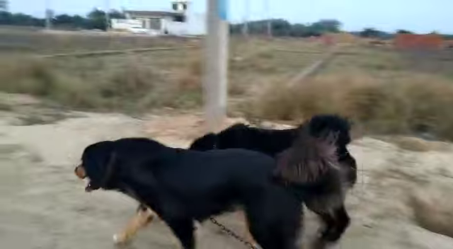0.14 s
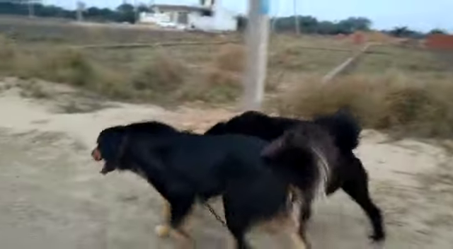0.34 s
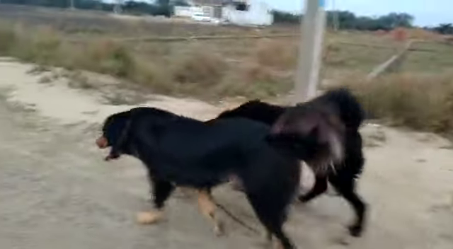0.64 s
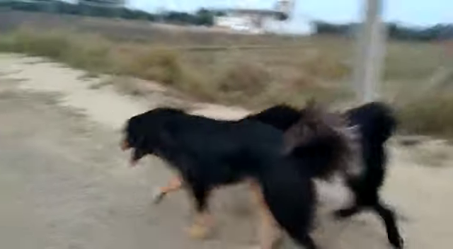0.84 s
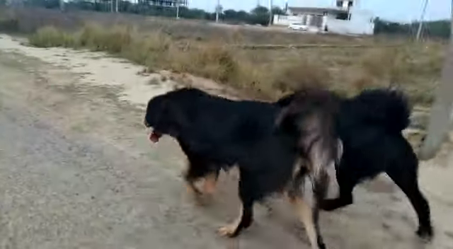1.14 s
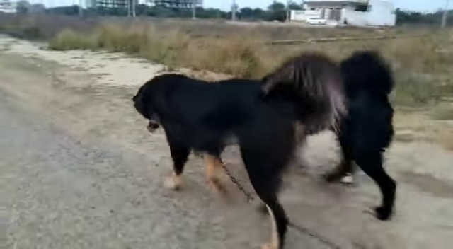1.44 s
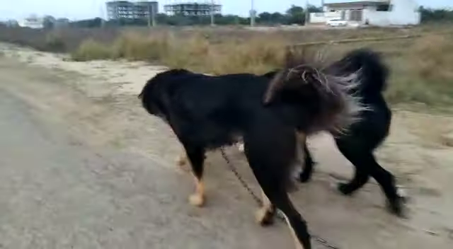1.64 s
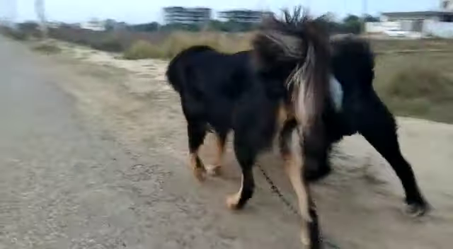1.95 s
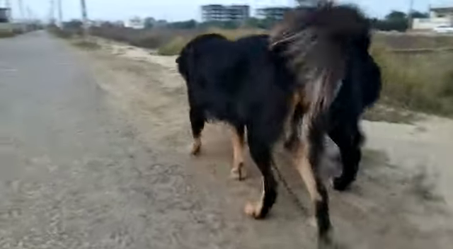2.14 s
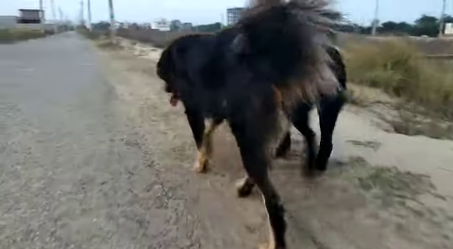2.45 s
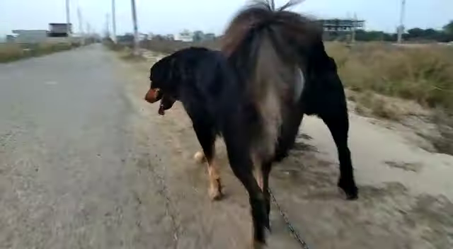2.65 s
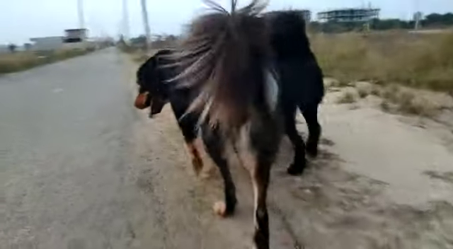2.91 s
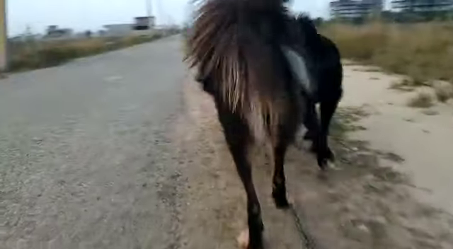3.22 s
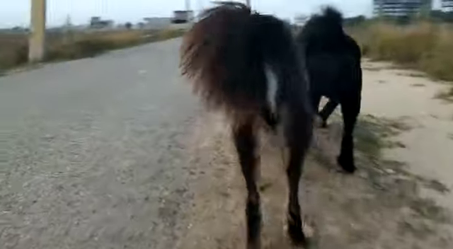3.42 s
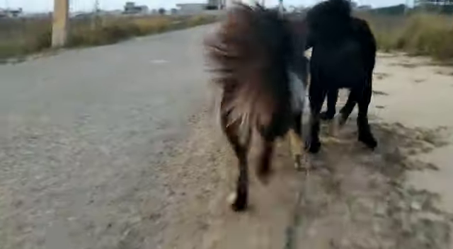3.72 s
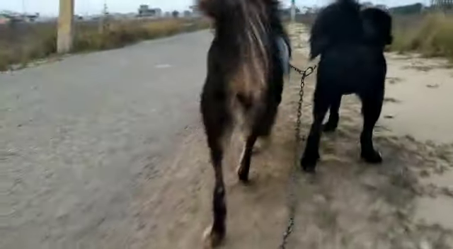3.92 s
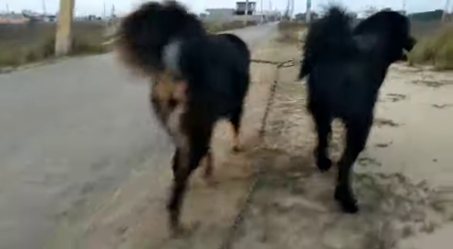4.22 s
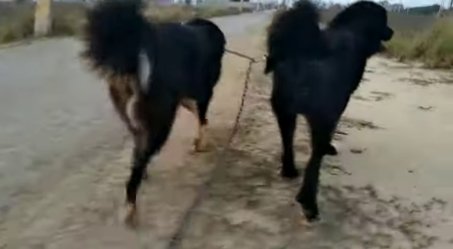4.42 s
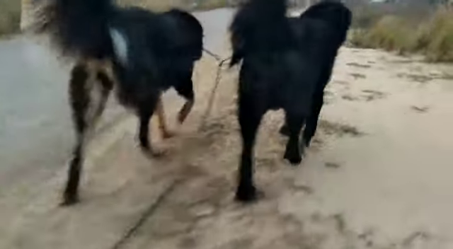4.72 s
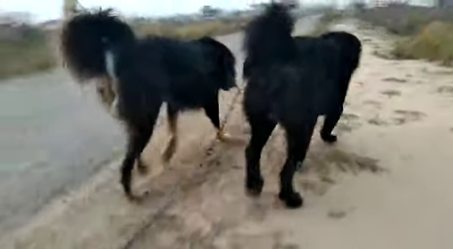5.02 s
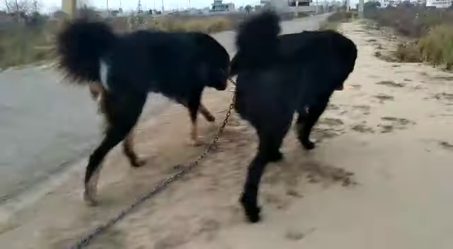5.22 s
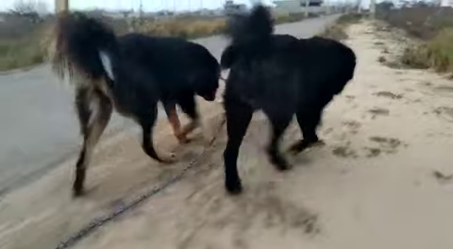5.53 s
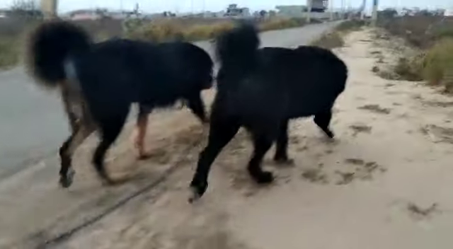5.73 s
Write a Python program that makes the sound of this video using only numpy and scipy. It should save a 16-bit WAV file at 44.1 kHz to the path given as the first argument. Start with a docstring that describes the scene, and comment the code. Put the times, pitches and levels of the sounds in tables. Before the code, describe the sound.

Thin metal links clink in scattered bursts, busiest around four seconds, over faint outdoor air, small birds, grit scrapes and wind puffs.

```python
"""A steel chain couples two big dogs on a quiet country road: links tick, ring, jingle and rattle.
Blows excite the chain's ringing modes; its free end drags over the grit as many tiny bursts of noise.
Soft paw pats are shaped noise, small birds whistle gliding tones, and a light breeze and a distant wash
are noise whose level comes and goes. Fingers slip on the hand-held phone, as short rough noise pushes.
The phone hears it all through two closely spaced ports, left and right."""
import sys
import numpy as np
from scipy import signal
from scipy.fft import rfft, irfft, next_fast_len
from scipy.io import wavfile
from scipy.ndimage import uniform_filter1d

SR = 44100
rng = np.random.default_rng(int(sys.argv[2]) if len(sys.argv) > 2 else 0)


def dump_mix(stems):
    """Bounce the given channels to the path in sys.argv[1] as a 16-bit WAV at rate SR."""
    frames = np.atleast_2d(stems).T  # one column per channel
    limited = np.clip(frames, -1, 1)  # hard clip at full scale
    pcm = np.round(limited * 32767).astype(np.int16)
    wavfile.write(sys.argv[1], SR, pcm)


N = 258426
TIME = np.arange(N) / SR

# Table levels are in dB; most layers also get an overall level where they are mixed.
# ringing modes of the chain, by letter (k to n are the short-lived ones of links under load):
# [f/Hz, level under a light touch/dB, time to fall 60 dB when free/s, scatter between links/Hz]
CHAIN_MODES = {"a": (7450, -14, .2, 25), "b": (8060, -13, .2, 35), "c": (8256, -11, .3, 15),
               "d": (8390, -13, .25, 30), "e": (8652, 0, .45, 7), "f": (8945, -1, .35, 25),
               "g": (9781, -13, .45, 8), "h": (10098, -10, .33, 12), "i": (11305, -14, .35, 10),
               "j": (14228, -9, .42, 10), "k": (7590, -14, .1, 60), "l": (8520, -12, .12, 50),
               "m": (8850, -10, .16, 30), "n": (9130, -12, .1, 45)}
# tone colour of links choked by their neighbours: [f/Hz, level/dB]
CLATTER_COLOUR = [(6000, -13), (7700, 16), (8100, -7), (8500, -7), (8930, 26), (9300, 17), (10100, 4),
                  (10700, -13), (11300, 23), (12200, 5), (15000, -26)]
# tone colour of grit and stones under the chain: [f/Hz, level/dB]
GRIT_COLOUR = [(1500, -13.5), (3000, -3), (4500, -16), (5400, 8), (6500, 3), (8000, 1.5), (11000, 0),
               (15000, -42)]
# tone colour of the distant wash, and of paws on sand: [f/Hz, level/dB]
WASH_COLOUR = [(100, -10.5), (350, -1.5), (750, 2), (1200, -2.5), (1800, -11), (3300, -7.5), (4600, -12),
               (8000, -13), (15300, -15.5), (16000, -51)]
# a dog's pull shakes the chain: [t/s, length/s, level of swinging links/dB, level of trailing links/dB]
PULLS = [(-.05, 0.048, -63, -67), (0.31, 0.36, -63, -66), (0.535, 0.29, -62.5, -60), (1.31, 0.27, -75, -64),
         (1.597, 0.3, -65, -58.5), (2.096, 0.54, -63, -71), (2.6, 0.2, -57.5, -55), (3.117, 0.13, -59, -53),
         (3.77, 0.11, -45, -56), (4.006, 0.08, -45.5, -53), (4.268, 0.45, -59, -57.5),
         (5.127, 0.057, -78, -60.5), (5.28, 0.06, -64, -58), (5.44, 0.16, -61, -55),
         (5.602, 0.26, -60.5, -53)]
PULL_ATTACK_S, PULL_RELEASE_S, PULL_SAG_DB_PER_S = 0.067, 0.1, -5.5


def undb(db):
    """Decibels to gain."""
    return 10 ** (np.asarray(db) / 20)


def unit(x):
    """Scale to rms 1."""
    return x / np.sqrt(np.mean(x ** 2) + 1e-20)


def gain_at(points, hz):
    """Gain of a (Hz, dB) spectrum, joined by straight lines on a log-frequency axis."""
    f, db = np.transpose(points)
    return undb(np.interp(np.log(hz + 1), np.log(f), db))


def colour(x, points, size=2048):
    """Causal filter with the given spectrum shape, built from the cepstrum of its log gain."""
    cepstrum = irfft(np.log(gain_at(points, np.fft.rfftfreq(size, 1 / SR))))
    # folding the cepstrum forward puts the whole response after the impulse
    cepstrum[1:size // 2] *= 2
    cepstrum[size // 2 + 1:] = 0
    response = irfft(np.exp(rfft(cepstrum)))
    return signal.fftconvolve(x, response / np.linalg.norm(response))[:len(x)]


def add(track, s, sound):
    """Mix a sound into the track at time s, cutting what falls outside."""
    start = int(s * SR)
    lo, hi = max(start, 0), min(start + len(sound), N)
    if hi > lo:
        track[lo:hi] += sound[lo - start:hi - start]


def curve(table):
    """A table of (s, value), joined by straight lines in time."""
    return np.interp(TIME, *np.transpose(table))


def walk(rate):
    """Wandering level: random values held for 1 / rate s and smoothed twice; spread near 1."""
    k = int(SR / rate)
    held = rng.standard_normal(N)[np.arange(N) // k]
    return 1.3 * uniform_filter1d(uniform_filter1d(held, k), k)


def flutter(shape, rate, db):
    """Gain that jumps about at the given rate, rms 1."""
    k = int(SR / rate)
    jumps = np.sqrt(k) * uniform_filter1d(rng.standard_normal(shape), k)
    return unit(undb(db * np.clip(jumps, -2, 2)))


def swells(rows, attack_s, release_s, sag_db_per_s, idle_db):
    """Gain of (s, length, dB) motions that rise, sag while they last and die away to an idle level."""
    power = undb(idle_db) ** 2
    for s, length, db in rows:
        t = TIME - s
        rise = np.clip(1 + t / attack_s, 0, 1)
        fall = np.exp(-np.clip((t - length) / release_s, 0, 20))
        sagging = undb(db + sag_db_per_s * np.clip(t, 0, length))
        power = power + (rise * fall * sagging) ** 2
    return np.sqrt(power)


def contacts(rate, spread_db):
    """Random impacts of uneven size and sign, about rate per second, rms 1."""
    size = undb(spread_db * np.minimum(rng.exponential(size=N), 4))
    hits = rng.random(N) < rate / SR
    return unit(hits * size * rng.choice([-1, 1], N))


def grains(rate, spread_db, decay_s):
    """Random impacts, each a tiny fading burst of noise, rms 1."""
    impacts = contacts(rate, spread_db)
    power = signal.lfilter([1], [1, -np.exp(-2 / (decay_s * SR))], impacts ** 2)
    return unit(np.sqrt(power) * rng.standard_normal(N))


def bursts(table, points, catch_db=0, size=8192):
    """Short rough (s, dB, length, hardness) pushes on a body; hard ones are brighter, catch_db roughens."""
    out, t = np.zeros(N), np.arange(size) / SR
    for s, db, length, hardness in table:
        swell = t / length * np.exp(-2 * (t / length) ** 2)
        push = swell * rng.standard_normal(size) * flutter(size, rate=420, db=catch_db)
        tilted = [(hz, level + hardness * np.log2(hz)) for hz, level in points]
        add(out, s, unit(colour(push, tilted)) * np.sqrt(length * SR / size) * undb(db))
    return out


def ports(x, balance, diffuse_db):
    """Left and right port: treble reaches the left later; sound scattered by the ground differs in each."""
    # phase by which left leads right: [f/Hz, phase/rad]
    port_phase = [(0, 0), (1640, 0), (2070, -3.1), (2850, -3.2), (3360, -6), (4000, -6.6), (4800, -9.3),
                  (5700, -11.3), (8960, -20.1), (13400, -30.8), (16200, -36)]
    size = next_fast_len(N + SR // 10)
    hz, spectrum = np.fft.rfftfreq(size, 1 / SR), rfft(x, size)
    lean = np.sqrt(gain_at(balance, hz))
    turn = np.exp(1j * np.interp(hz, *np.transpose(port_phase)))
    direct = irfft(np.array([spectrum * lean * turn, spectrum / lean]), size)[:, :N]
    t = TIME[:SR // 10]
    ground = rng.standard_normal((2, len(t))) * t * np.exp(-t / 0.0037)
    ground /= np.linalg.norm(ground, axis=1, keepdims=True)
    return direct + undb(diffuse_db) * signal.fftconvolve(x[None], ground, axes=1)[:, :N]


def distant_wash(db):
    """A far wash over the fields: coloured noise whose level wanders."""
    # [t/s, level/dB]
    wash_level = [(0.0, -63), (0.47, -65), (1.22, -61.5), (1.99, -67.5), (2.35, -64), (3.33, -66.5),
                  (3.87, -68), (4.06, -76), (4.32, -72.5), (5.02, -68), (5.26, -65.5), (5.6, -68.5),
                  (5.86, -65)]
    swell = 1.2 * walk(11)
    return undb(curve(wash_level) + db + swell) * colour(rng.standard_normal(N), WASH_COLOUR)


def paws(db):
    """Soft pats of paws on sand: short noise pushes, slightly dulled."""
    # [t/s, level/dB, length/s]
    pats = [(0.028, -46.5, 0.0041), (0.411, -49.5, 0.0046), (0.483, -54.5, 0.005), (0.594, -50.5, 0.007),
            (1.246, -56.5, 0.036), (1.377, -51, 0.0054), (1.591, -51, 0.0061), (3.064, -48, 0.0029),
            (2.87, -58.5, 0.021), (3.356, -50.5, 0.0029), (3.419, -53, 0.0067), (3.64, -55.5, 0.0088),
            (3.713, -49.5, 0.0076), (0.646, -56, 0.006), (3.993, -58, 0.0076), (4.736, -56, 0.0091)]
    hardness = -2  # dB per octave
    return undb(db) * bursts([(*row, hardness) for row in pats], WASH_COLOUR)


def thump(s, hz, db, length):
    """A short low boom at the ports: a tone that swells and fades once."""
    out, t = np.zeros(N), TIME[:int(length * SR)]
    add(out, s, undb(db) * np.sin(np.pi * t / length) * np.sin(2 * np.pi * hz * t))
    return out


def wind(breeze_db, puff_db, rumble_db):
    """Eddies push one port while they pull the other; a far rumble reaches both alike."""
    # tone colour of the breeze and the rumble: [f/Hz, level/dB]
    breeze_colour = [(25, -42.5), (45, -18.5), (65, -4), (105, 4), (170, -1), (260, -7.5), (450, -18),
                     (1000, -51.5)]
    # strength of the breeze: [t/s, level/dB]
    breeze_level = [(0, -70), (.6, -72.5), (1.1, -58.5), (1.6, -72.5), (2.5, -71.5), (3.6, -70), (4.3, -60),
                    (4.7, -55.5), (4.85, -53), (5.05, -58), (5.3, -52), (5.86, -57.5)]
    # puffs of air on the ports: [t/s, level/dB, length/s, hardness/dB per octave]
    puffs = [(1.117, -21, 0.012, 2.5), (3.655, -40, 0.025, -13.5), (4.011, -33, 0.035, -6),
             (4.022, -25.5, 0.0056, 0.5), (4.08, -47.5, 0.036, -5.5), (4.142, -42.5, 0.008, -7),
             (4.366, -43, 0.019, 1.5), (4.405, -49, 0.031, -4.5), (4.5, -44.5, 0.0092, -0.5),
             (4.625, -33.5, 0.016, -13.5), (4.655, -35, 0.0047, -9), (4.682, -35, 0.0065, -3.5),
             (4.696, -35, 0.0058, -6.5), (4.72, -30.5, 0.0067, -5), (4.773, -43.5, 0.008, -6),
             (5.29, -44.5, 0.015, -5), (5.39, -46, 0.037, -4)]
    # tone colour of a puff: [f/Hz, level/dB]
    puff_colour = [(30, -65), (70, -10), (130, -8), (190, -1), (260, -1.5), (500, -14), (800, -27.5),
                   (2000, -73), (6000, -53)]
    gusts = 2.6 * walk(14)
    breeze = undb(curve(breeze_level) + breeze_db + gusts) * colour(rng.standard_normal(N), breeze_colour)
    puffing = undb(puff_db) * bursts(puffs, puff_colour)
    eddies = breeze + puffing + thump(s=4.008, hz=189, db=-24, length=0.057)
    rumble = undb(rumble_db + walk(7.8)) * colour(rng.standard_normal(N), breeze_colour)
    return np.array([[-.66], [1.05]]) * eddies + rumble


def birds(db, echo_db, echo_s, slap_db, slap_s, rasp_hz, count=5):
    """Small birds whistle short glides and one quick raspy trill; the field throws them back faintly."""
    # glides that bow up (or down, if negative) in the middle:
    # [t/s, length/s, start f/Hz, end f/Hz, bow/Hz, level/dB]
    chirps = [(-.02, 0.039, 2990, 3670, 2, -56.5), (-.01, 0.1, 4630, 4190, -21, -62),
              (0.082, 0.024, 4130, 5100, 5, -54.5), (0.103, 0.038, 5100, 4300, 102, -51.5),
              (0.2, 0.048, 4000, 3000, 601.5, -53.5), (.24, 0.05, 2970, 2580, -60, -65),
              (0.353, 0.057, 3660, 3770, -1.5, -60), (0.396, 0.064, 3640, 3790, 334, -48),
              (.427, 0.058, 4180, 4430, 36, -53.5), (.27, 0.041, 4250, 3740, 50, -65.5),
              (.726, .035, 3250, 3680, 177, -63), (.75, 0.055, 3600, 2940, -2, -57),
              (0.788, 0.044, 3600, 3020, 62, -61.5), (1.04, 0.092, 3480, 3020, 620, -57.5),
              (1.122, 0.029, 3330, 2760, 43, -40.5), (1.135, 0.037, 3700, 3140, 30, -59),
              (1.293, 0.031, 4090, 3930, 200, -63.5), (1.313, 0.049, 3790, 4100, -3, -64.5),
              (3.361, 0.12, 2946, 2966, 23, -63.5), (4.857, 0.074, 3610, 2770, 3, -66),
              (5.265, 0.078, 3680, 3640, 60, -71), (5.317, 0.068, 3640, 2900, 7, -65.5),
              (5.775, 0.07, 3700, 2950, 90, -64.5)]
    trill_s, step_s, note_s, trill_rasp_hz = .503, .014, .021, 330
    trill = []
    for k, (early, loud) in enumerate(rng.standard_normal((count, 2))):
        start_s = trill_s + step_s * (k + 0.15 * early)
        trill.append((start_s, note_s, 6650, 3940, 0, -49 + 2 * loud))

    out = np.zeros(N)
    for notes, waver_hz in (chirps, rasp_hz), (trill, trill_rasp_hz):
        for s, length, start_hz, end_hz, bow_hz, chirp_db in notes:
            u = np.linspace(0, 1, int(length * SR))
            waver = unit(uniform_filter1d(rng.standard_normal(SR // 4), size=24))[:len(u)]
            glide = start_hz + (end_hz - start_hz) * u + bow_hz * np.sin(np.pi * u)
            hz = glide + waver_hz * waver
            note = undb(chirp_db + db) * np.sin(np.pi * u) * np.sin(2 * np.pi * np.cumsum(hz) / SR)
            add(out, s, note)
            add(out, s + slap_s, undb(slap_db) * note)  # one distinct echo
    field = rng.standard_normal(SR // 2) * np.exp(-TIME[:SR // 2] / echo_s)
    return out + undb(echo_db) * signal.fftconvolve(out, field / np.linalg.norm(field))[:N]


def fingers(db):
    """Fingers slip on the phone in short rough pushes; a soft knock comes with the low boom."""
    # the last row is the knock: [t/s, level/dB, length/s, hardness/dB per octave]
    rubs = [(1.075, -44, 0.056, 5), (1.110, -36, 0.01, 2), (1.119, -30, 0.012, 3), (1.132, -25, 0.0031, -1),
            (1.146, -44.5, 0.017, 8.5), (1.162, -43.5, 0.0056, 0), (3.135, -22, 0.0053, -1),
            (3.141, -19, 0.0055, 1), (3.154, -29, 0.0041, 4.5), (3.160, -16, 0.0095, 0.5),
            (3.171, -19, 0.0086, -1), (3.182, -30.5, 0.017, 4.5), (3.199, -27.5, 0.0044, 3),
            (3.209, -24, 0.0038, -1), (3.216, -43, 0.023, 4), (3.247, -37.5, 0.0053, 4),
            (3.25, -54, .035, 7), (4.022, -39, .004, -2)]
    # tone colour of the finger rubs, strongest about 400 to 920 Hz, uneven: [f/Hz, level/dB]
    rub_colour = [(100, -43), (250, -27), (320, -22.5), (400, 4), (455, -4.5), (545, 4.5), (660, -3),
                  (745, 4.5), (830, -2), (920, -0.5), (1010, -8), (1200, -7), (1600, -17), (2200, -21),
                  (3300, -18.5), (5000, -30.5), (8000, -31.5), (11000, -29), (13500, -36), (15500, -42)]
    return undb(db) * bursts(rubs, rub_colour, catch_db=4)


def stones():
    """The trailing end strikes stones: short, bright noise pushes."""
    # [t/s, level/dB, length/s]
    strikes = [(0.595, -43, 0.0055), (2.18, -35.5, 0.0018), (3.77, -40, 0.0012), (3.791, -39, 0.0067),
               (5.4615, -42.5, 0.003), (5.4965, -33, 0.0014), (5.839, -32.5, 0.00074)]
    hardness = 4.5  # dB per octave
    return bursts([(*row, hardness) for row in strikes], GRIT_COLOUR)


def scrape():
    """The chain's end drags over the grit: a dense shower of tiny noise bursts."""
    # [t/s, length/s, level/dB]
    drags = [(.512, 0.18, -54.5), (.598, 0.023, -45), (1.09, 0.011, -44.5), (1.45, 0.13, -56.5),
             (2.18, 0.015, -47), (2.64, 0.037, -56.5), (3.145, 0.043, -44.5), (3.725, 0.075, -45.5),
             (3.88, 0.23, -54.5), (4.19, 0.3, -61.5), (5.47, 0.05, -54.5), (5.837, .005, -72)]
    dragging = swells(drags, attack_s=0.019, release_s=0.048, sag_db_per_s=-23, idle_db=-77.5)
    grit = grains(rate=1100, spread_db=4.2, decay_s=0.0009)
    return dragging * colour(grit, GRIT_COLOUR)


def rattle(db):
    """Trailing links rattle as the dogs pull: many tiny touches whose level wanders."""
    # [f/Hz, level/dB]
    rattle_colour = [(3000, -44), (7000, -6), (9000, -2), (11000, 0.5), (11900, 6), (12150, 13.5),
                     (14000, 10), (15400, 7), (15750, -32)]
    s, length, _, rattle_db = np.transpose(PULLS)
    rows = zip(s, length, rattle_db)
    trailing = swells(rows, PULL_ATTACK_S, PULL_RELEASE_S, PULL_SAG_DB_PER_S, idle_db=-101)
    clusters = undb(1.3 * walk(30))
    touches = grains(rate=1500, spread_db=3.3, decay_s=0.0009)
    return undb(db) * trailing * clusters * colour(touches, rattle_colour)


def jingle(rate, free):
    """Light touches between swinging links keep their modes ringing, now one, now another."""
    out = 0
    for hz, db, t60, _ in CHAIN_MODES.values():
        # a resonator; free is the share of the free ring time that is left
        pole = np.exp(2j * np.pi * hz / SR - np.log(1000) / (t60 * free * SR))
        ringing = signal.lfilter([1], [1, -pole], contacts(rate, 2)).imag
        out = out + undb(db + 5 * walk(14)) * unit(ringing)
    return unit(out)


def swing():
    """Links swing as the dogs pull: some touches let them ring, others are choked at once."""
    s, length, jingle_db, _ = np.transpose(PULLS)
    rows = zip(s, length, jingle_db)
    swinging = swells(rows, PULL_ATTACK_S, PULL_RELEASE_S, PULL_SAG_DB_PER_S, idle_db=-94)
    damped = colour(grains(rate=140, spread_db=3.5, decay_s=.004), CLATTER_COLOUR)
    return swinging * (undb(-0.5) * jingle(rate=90, free=0.32) + undb(-2.5) * damped)


def clinks(tick_db, ring_db, clatter_db, clatter_s):
    """Link hits link: a stuttering tick, a brief clatter of neighbours, and modes that ring until caught."""
    # [t/s, tick level/dB, ring level/dB, time until the link is caught/s,
    #  letters of the modes that the blow favours, strongest first]
    blows = [(.3037, -45, -55, .12, "je"), (.4, -37, -53, .04, "fe"), (.51, -50, -49, .1, "e"),
             (.594, -31, -51, .05, "feh"), (.6098, -27, -56, .01, "m"), (.6152, -18, -47, .06, "ef"),
             (.6518, -28, -55, .01, "h"), (.717, -37, -48, .01, "bn"), (1.206, -42, -62, .01, "j"),
             (1.289, -48, -45, .12, "e"), (1.436, -26, -56, .01, "f"), (1.474, -33, -60, .01, "e"),
             (1.503, -31, -60, .01, "e"), (1.5065, -30, -52, .04, "fe"), (1.5185, -34, -52, .035, "ml"),
             (1.5635, -37, -60, .01, "j"), (1.628, -46, -50, .06, "fj"), (1.7, -50, -52, .1, "f"),
             (1.803, -46, -51, .02, "bj"), (1.825, -42, -48, .025, "eh"), (1.922, -45, -52, .04, "j"),
             (2.554, -33, -55, .03, "e"), (2.605, -26, -49, .035, "aeb"), (2.613, -26, -52, .01, "k"),
             (2.647, -14, -34, .012, "hij"), (2.6534, -21, -29, .005, "i"), (2.656, -34, -38, .05, "feh"),
             (2.7305, -33, -60, .01, "e"), (2.817, -35, -60, .01, "f"), (3.1647, -21, -24, .008, "gh"),
             (3.6447, -33, -59, .01, "h"), (3.7078, -28, -52, .01, "j"), (3.7262, -22, -50, .01, "j"),
             (3.7406, -24, -35, .005, "nme"), (3.7484, -17, -30, .012, "nbf"),
             (3.7816, -31, -33, .02, "fd"), (3.7938, -16, -30, .008, "cl"), (3.82, -36, -29, .05, "efh"),
             (3.8874, -28, -37, .012, "eig"), (3.911, -25, -38, .03, "fdaj"), (3.924, -34, -34, .02, "md"),
             (3.9582, -22, -32, .014, "cdmi"), (3.967, -27, -37, .035, "jil"), (3.983, -32, -31, .012, "c"),
             (4.0166, -24, -27.5, .11, "jg"), (4.019, -34, -33, .015, "hi"), (4.056, -35, -37, .03, "fm"),
             (4.08, -33, -39, .07, "gjfa"), (4.1735, -24, -36, .012, "jefh"),
             (4.1967, -28, -37, .012, "mbk"), (4.2165, -23, -40, .012, "lck"), (4.2725, -38, -49, .02, "d"),
             (4.3355, -25, -53, .02, "dh"), (4.4017, -37, -37, .06, "ih"), (4.4142, -33, -33, .08, "ifhg"),
             (4.4985, -39, -38, .05, "ieh"), (4.562, -35, -43, .025, "hej"), (4.59, -31, -57, .01, "j"),
             (4.599, -31, -57, .01, "e"), (4.6187, -38, -60, .01, "j"), (4.69, -45, -48, .03, "hf"),
             (4.7105, -38, -44, .018, "hei"), (4.7655, -37, -42, .015, "hfej"),
             (4.8635, -40, -60, .01, "d"), (4.8861, -40, -37, .018, "h"), (5.1066, -42, -62, .01, "j"),
             (5.2568, -36, -50, .01, "d"), (5.2667, -32, -34, .022, "hi"), (5.268, -42, -39, .055, "j"),
             (5.305, -50, -48, .025, "ej"), (5.372, -31, -55, .01, "c"), (5.4623, -23, -52, .02, "f"),
             (5.4972, -22, -50, .02, "fe"), (5.5795, -39, -43, .02, "i"), (5.612, -45, -33.5, .035, "h"),
             (5.657, -40, -44, .012, "cd"), (5.697, -17.5, -54, .01, "h"), (5.7472, -25, -52, .03, "djg"),
             (5.8392, -12, -41, .04, "hfe")]
    # [f/Hz, level/dB]
    tick_colour = [(500, -1.5), (2000, -15.5), (3300, -16), (4600, -13), (5500, -3.5), (7500, 4.5),
                   (8700, 7.5), (10500, 13.5), (13000, 13.5), (15300, 10), (16300, -3)]
    tick_s, caught_t60_s = .00045, 0.13  # the neighbours choke a caught link
    chatter_s, chatter_db = 0.0015, -9.5  # the contact stutters
    bounce_s, bounce_db = 0.018, -17  # a struck link falls back and touches again
    mode_step_db, other_modes_db = -2, -22.5  # each favoured mode is a step weaker than the last
    partner_db, partner_scatter_hz = -12, 140  # the other link of the pair
    buzz_hz, buzz_db = 200, 2.2  # a ringing link buzzes against its neighbours

    ticks, clatter, rings, t = np.zeros(N), np.zeros(N), np.zeros(N), TIME[:SR // 4]
    hz, mode_db, t60, scatter_hz = np.transpose(list(CHAIN_MODES.values()))
    for s, strike_db, strength_db, free_s, struck in blows:
        chatter, bounce = s + np.array([chatter_s, bounce_s]) * (.5 + rng.random(2))
        for when, db in (s, 0), (chatter, chatter_db), (bounce, bounce_db):
            tick = rng.standard_normal(SR // 100) * np.exp(-TIME[:SR // 100] / tick_s)
            add(ticks, when, undb(strike_db + db) * unit(tick) / np.sqrt(len(tick)))

        choked = rng.standard_normal(len(t)) * np.exp(-t / clatter_s)
        add(clatter, s, undb(strength_db) * choked)

        share_db = np.array([
            mode_step_db * struck.index(name) if name in struck else other_modes_db + db / 2
            for name, db in zip(CHAIN_MODES, mode_db)])
        decay = t / t60[:, None] + np.maximum(t - free_s, 0) / caught_t60_s
        fade = undb(-60 * decay) * np.minimum(t / tick_s, 1)
        # both links ring, slightly out of tune, and beat against each other
        for db, spread_hz in (0, scatter_hz), (partner_db, partner_scatter_hz):
            pitch = hz + spread_hz * rng.standard_normal(len(hz))
            buzz = flutter(fade.shape, buzz_hz, buzz_db)
            modes = buzz * fade * np.sin(2 * np.pi * np.outer(pitch, t))
            add(rings, s, undb(strength_db + db + share_db) @ modes)
    rings = signal.sosfilt(signal.butter(4, 5000, "high", fs=SR, output="sos"), rings)
    ticking = undb(tick_db) * colour(ticks, tick_colour)
    clattering = undb(clatter_db) * colour(clatter, CLATTER_COLOUR)
    return ticking + clattering + undb(ring_db) * rings


def chain():
    """The swinging part jingles and clinks; the trailing end rattles, scrapes over grit and strikes stones."""
    blows = clinks(tick_db=7.0, ring_db=-2, clatter_db=-8.5, clatter_s=.006)
    return swing() + rattle(db=4.0) + scrape() + blows + stones()


def scene():
    """Fields, birds, fingers and chain at the two ports, plus the wind."""
    # left minus right port, for sound through the air: [f/Hz, level/dB]
    port_balance = [(100, -1), (380, -1), (700, -6.5), (1300, -1), (2400, 1.5), (4400, -2.5), (8000, -5.5),
                    (15000, -3)]
    # the same for the finger rubs, where the fingers shade the left port: [f/Hz, level/dB]
    hand_balance = [(200, -4), (400, -9), (750, -10.5), (1300, -2), (2400, -1.5), (4400, -6), (15000, 1)]
    fields = distant_wash(db=4.5) + paws(db=0.0)
    chirping = birds(db=6.0, echo_db=-14.5, echo_s=0.033, slap_db=-14.5, slap_s=0.023, rasp_hz=53.0)
    far = ports(fields + chirping, port_balance, diffuse_db=-9.0)
    air = far + wind(breeze_db=11, puff_db=4.5, rumble_db=-60.5)
    hand = ports(fingers(db=-3.5), hand_balance, diffuse_db=-5.0)
    links = ports(chain(), port_balance, diffuse_db=-12)
    return links + hand + air


def record(dry):
    """The phone cuts the top: a steep low-pass at 16 kHz."""
    return signal.sosfilt(signal.ellip(8, .2, 80, 16000, fs=SR, output="sos"), dry)


dry = scene()
out = record(dry)
dump_mix(out)
```